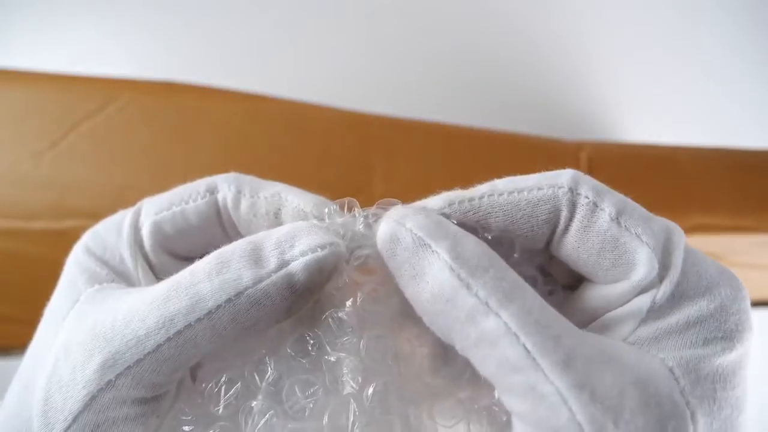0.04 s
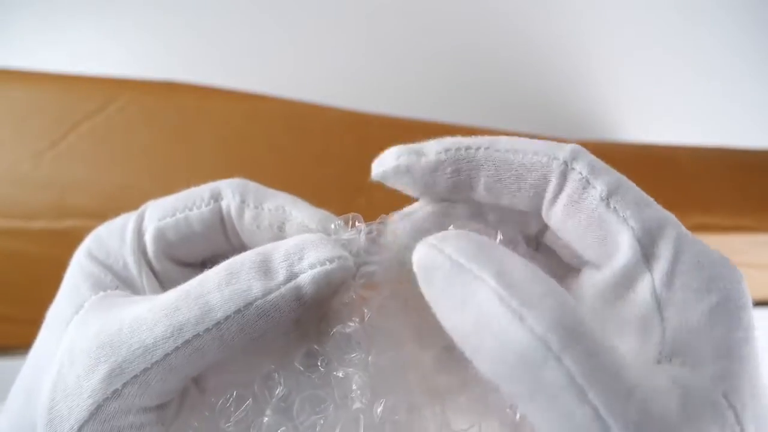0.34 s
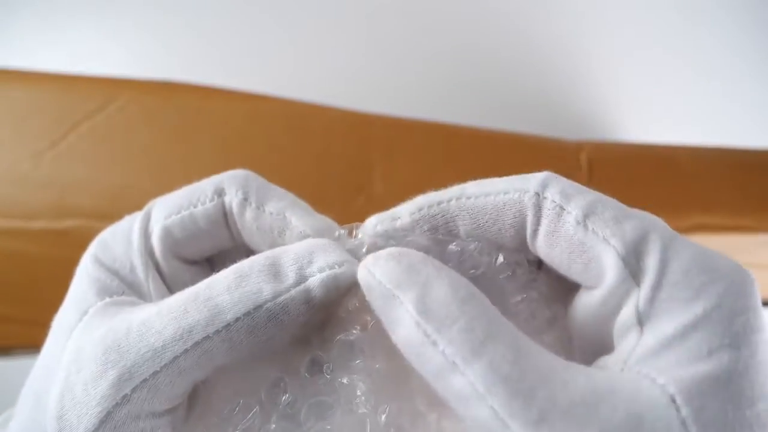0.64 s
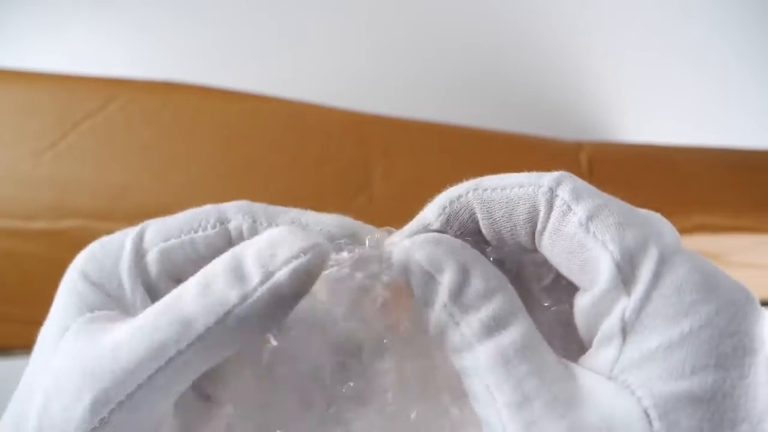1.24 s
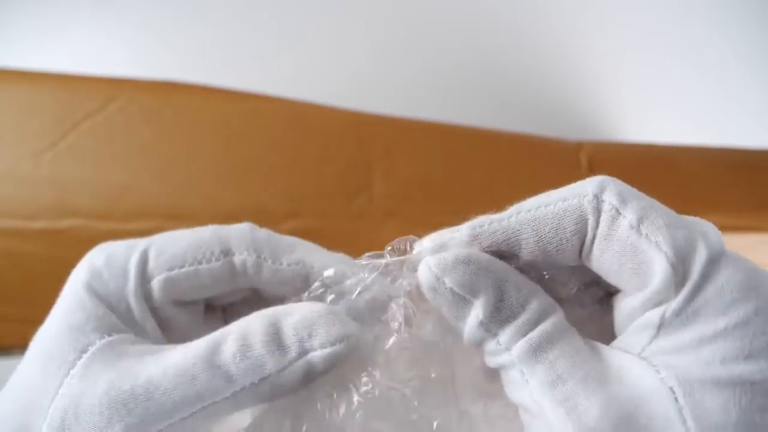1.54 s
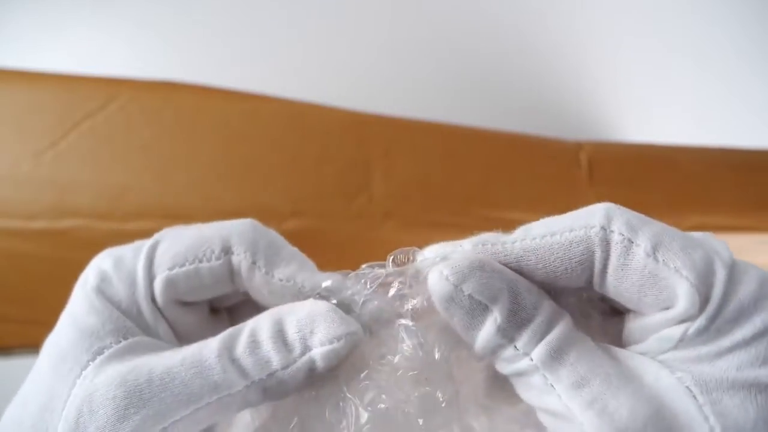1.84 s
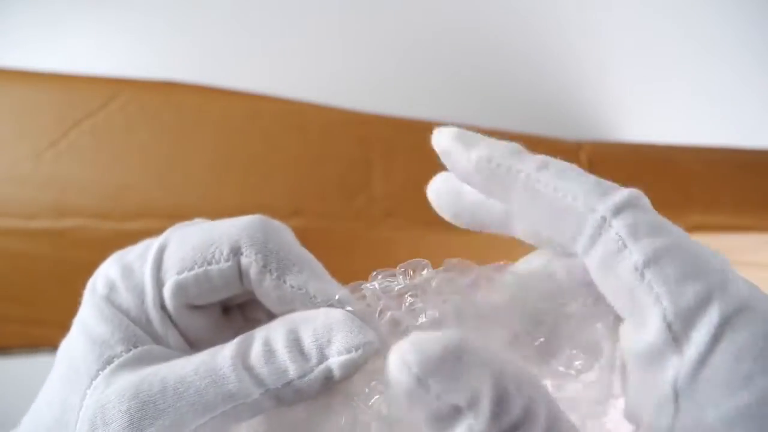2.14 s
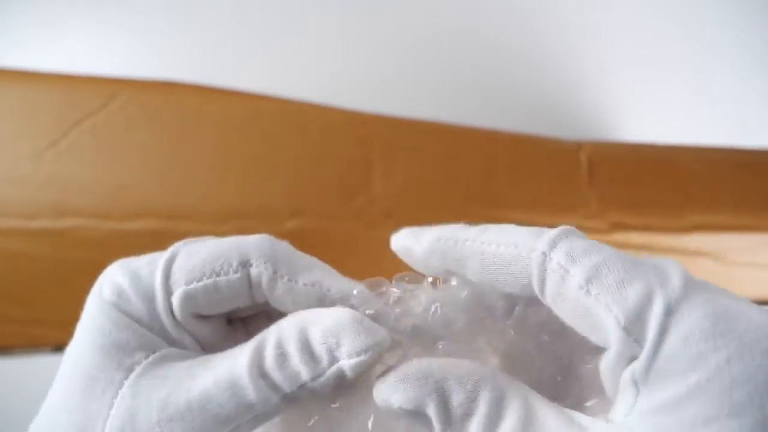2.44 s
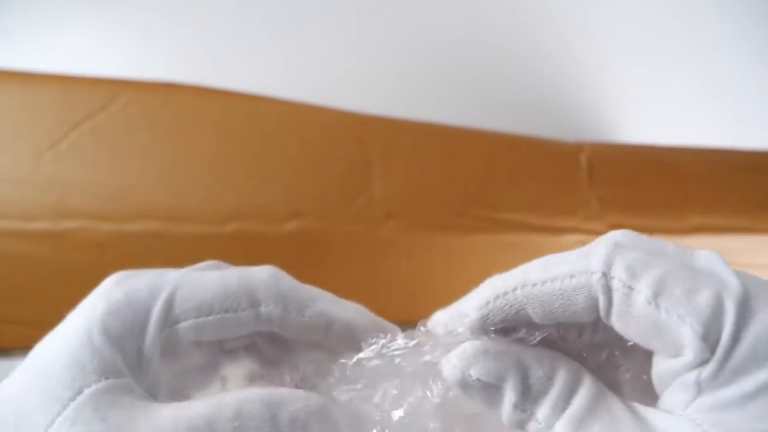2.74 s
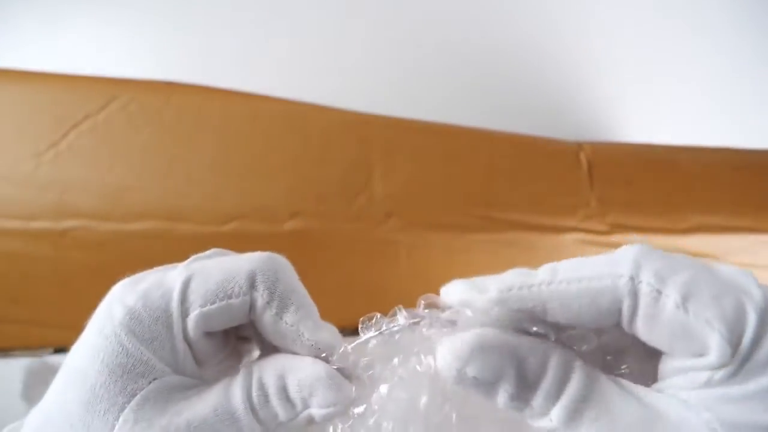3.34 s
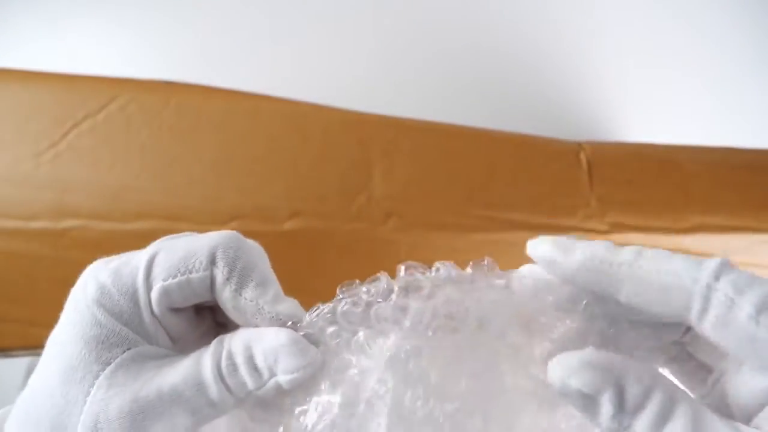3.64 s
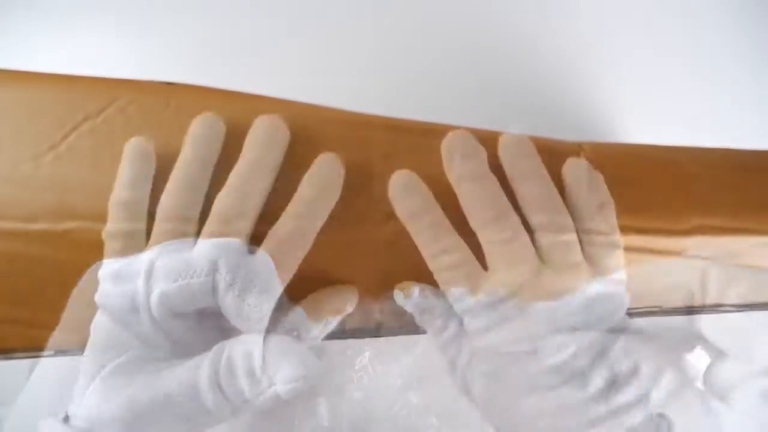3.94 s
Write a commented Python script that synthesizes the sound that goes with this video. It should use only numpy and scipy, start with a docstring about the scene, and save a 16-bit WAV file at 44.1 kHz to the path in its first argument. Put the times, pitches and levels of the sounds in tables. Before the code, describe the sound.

Bubble wrap popping sharply between gloved fingers, with soft plastic crinkling throughout.

```python
"""Bubble wrap bursts as gloved fingers pinch and twist it, close to a microphone in a small room.
Each pop is a sudden release of pressure: a pulse, a ringing skin, tearing film and a thump.
Creases snap by buckling, and the film crinkles, rubs and ticks all the while.
The table and the walls reflect the sound briefly; the loudest pops overload the recorder."""
import sys
import numpy as np
from scipy import signal
from scipy.fft import rfft, irfft
from scipy.io import wavfile

SR = 44100
rng = np.random.default_rng(int(sys.argv[2]) if len(sys.argv) > 2 else 0)


def unload_audio(sound):
    """Save the sound as a 16-bit wav file, at the path given as the first command line argument."""
    columns = np.transpose(np.atleast_2d(sound))
    # keep every value between -1 and 1, then stretch to whole-number steps
    steps = np.round(np.clip(columns, -1, 1) * 32767)
    wavfile.write(sys.argv[1], SR, steps.astype(np.int16))


N = 176400


def undb(db):
    """Amplitude ratio of a level in decibels."""
    return 10 ** (np.asarray(db) / 20)

def unit(x):
    """Normalisation to rms 1."""
    return x / np.sqrt(np.mean(x ** 2))

def highpass(x, hz):
    """First-order high-pass: 6 dB per octave below the corner."""
    return signal.sosfilt(signal.butter(1, hz, "high", fs=SR, output="sos"), x)

def colour(x, points, size=4096):
    """Minimum-phase filter through (f/Hz, gain/dB) points, scaled to keep the power of white noise."""
    hz, db = np.array(points, float).T
    gain = undb(np.interp(np.log(np.fft.rfftfreq(size, 1 / SR) + 1), np.log(hz), db))
    cepstrum = irfft(np.log(unit(gain)))
    cepstrum[1:size // 2] *= 2
    cepstrum[size // 2 + 1:] = 0
    return signal.fftconvolve(x, irfft(np.exp(rfft(cepstrum))))[:len(x)]

def add(track, at, sound):
    """Superposition: a sound joins the track at a time in seconds."""
    i = max(0, int(at * SR))
    track[i:i + len(sound)] += sound[:max(0, N - i)]

def ring(t, hz, cycles):
    """Damped oscillation of a released skin, with no net flow; it falls to 1/e in `cycles` periods."""
    damping = 1 / (2 * np.pi * cycles)
    angle = 2 * np.pi * hz * t
    return np.exp(-damping * angle) * (np.cos(angle) - damping * np.sin(angle))

def clicks(per_s, spread_db):
    """Shot noise: impulses at random times, many weak and a few strong, rms 1."""
    chance, size, sign = rng.random(N), rng.standard_normal(N), rng.choice([-1, 1], N)
    return unit((chance < per_s / SR) * sign * undb(spread_db * np.minimum(size, 2.6)))

def showers(per_s=180, spread_db=2):
    """Random amplitude modulation, in dB: the surges heard as one buckling fold sets off others."""
    steps = np.arange(N) / SR * per_s
    return spread_db * np.interp(steps, np.arange(N), rng.standard_normal(N))

# Working of the sheet: t/s, relative crinkle level/dB, relative rubbing level/dB
HANDLING_LEVELS = [(0, -45, -40.5), (.13, -44, -49.5), (.17, -56, -47.5), (.21, -44, -47.5),
                   (.25, -39, -44), (.30, -36, -43), (.355, -35, -38.5), (.39, -44.5, -42),
                   (.47, -53, -45.5), (.55, -60, -47), (.60, -46.5, -50.5), (.71, -56, -47.5),
                   (.745, -53, -43), (.80, -53, -49.5), (.97, -53, -46.5), (1.04, -52.5, -47.5),
                   (1.16, -47.5, -41.5), (1.21, -34.5, -38.5), (1.26, -30, -39), (1.29, -33.5, -30.5),
                   (1.34, -40.5, -38.5), (1.42, -42, -35), (1.48, -37, -38), (1.57, -36, -37.5),
                   (1.62, -35, -37), (1.72, -47, -43), (1.80, -45, -44), (1.90, -50.5, -37),
                   (1.97, -46.5, -50), (2.00, -38, -39.5), (2.04, -35, -37), (2.14, -34.5, -36),
                   (2.27, -54, -41), (2.32, -47.5, -45), (2.387, -50.5, -44), (2.428, -30, -31),
                   (2.50, -39, -37.5), (2.549, -25.5, -30), (2.61, -34.5, -35), (2.70, -34, -33),
                   (2.80, -40.5, -38.5), (2.92, -41.5, -40), (3.01, -41, -37), (3.19, -40.5, -41.5),
                   (3.32, -45, -38), (3.38, -36.5, -34.5), (3.452, -32, -30.5), (3.53, -37, -35.5),
                   (3.61, -39.5, -35.5), (3.66, -36.5, -35.5), (3.75, -32.5, -30.5), (3.82, -31.5, -33.5),
                   (3.90, -43, -39.5), (4.0, -44.5, -42.5)]
# Spectral shape of the buckling folds: f/Hz, gain/dB
CRINKLE_SPECTRUM = [(100, -34), (800, -11), (2000, -20.5), (4200, 6.5), (5500, 1), (7500, 3.5),
                    (10500, 2.5), (15000, -1.5), (16500, -10)]
# Spectral shape of the friction: f/Hz, gain/dB
RUB_SPECTRUM = [(30, -3), (80, 2.5), (140, 0), (250, -5), (480, -2.5), (700, -3), (900, -0.5), (1300, -2.5),
                (1720, 4), (2100, 1.5), (2800, -1), (4100, -2), (6000, -5), (16000, -13.5)]

def rustle(folds_per_s=2000, fold_sizes=5, decay_s=0.00017):
    """Buckling and friction: small folds ring while cotton and film slip over the air-filled cells."""
    t = np.arange(N) / SR
    at, crinkle_db, rub_db = np.array(HANDLING_LEVELS, float).T
    folds = np.zeros(N)
    for hz in np.linspace(3800, 14000, fold_sizes):
        buckles = clicks(folds_per_s / fold_sizes, spread_db=6)
        folds += unit(signal.fftconvolve(buckles, ring(t[:256], hz, hz * decay_s))[:N])
    crinkle_gain = undb(np.interp(t, at, crinkle_db) - 0.5 + showers())
    crinkle = unit(colour(folds, CRINKLE_SPECTRUM)) * crinkle_gain
    slips = clicks(per_s=3400, spread_db=5)
    rub = unit(colour(slips, RUB_SPECTRUM)) * undb(np.interp(t, at, rub_db) + 1)
    return crinkle + rub

# Spectral shape of the ticks: f/Hz, gain/dB
TICK_SPECTRUM = [(500, -27), (1800, 12.5), (4000, 10), (7000, 0), (11000, -8.5), (16000, -17.5)]

def ticks(follow=0.46):
    """Acoustic emission: stretched film ticks even at rest, and partly follows the crinkle level."""
    at, crinkle_db, _ = np.array(HANDLING_LEVELS, float).T
    level_db = -31 + follow * np.interp(np.arange(N) / SR, at, crinkle_db)
    return colour(clicks(per_s=91, spread_db=10), TICK_SPECTRUM) * undb(level_db)

# Spectral shape of the background: f/Hz, gain/dB
BACKGROUND_SPECTRUM = [(20, 16), (55, 9), (120, -3.5), (300, -30.5), (700, -0.5), (1800, -29), (5000, -55),
                       (16000, -53)]

def background(level_db=-64):
    """Stationary noise: a faint, steady rumble in the room."""
    return undb(level_db) * unit(colour(rng.standard_normal(N), BACKGROUND_SPECTRUM))

# Bursting bubbles: t/s, level/dB, ring f/Hz, ring decay/cycles, opening time/ms, tear/dB, thump/dB,
# thump f/Hz, thump decay/cycles, room/dB (tear, thump and room are relative to the level)
BUBBLE_BURSTS = [(.0130, 12.5, 820, 0.2, 0.007, -11, -32.5, 40.2, 0.19, -6),
                 (0.8414, 13.5, 1490, 0.43, 0.008, -8, -34.5, 50, 0.37, -4.5),
                 (1.2745, 9.5, 1150, 0.34, 0.012, -14, -25, 100, 0.17, -8.5),
                 (1.5206, -0.5, 1640, 0.6, 0.068, -10, -11, 443, 0.5, 0.5),
                 (1.6460, 10, 1270, 0.29, 0.016, -3.5, -13.5, 260, 0.19, -15),
                 (1.8208, 7, 1160, 0.24, 0.01, -11, -17, 104, 0.39, -9),
                 (1.8921, -24.5, 1600, 0.35, .07, 2, 0.5, 332, 0.86, -15),
                 (2.1689, 8, 2230, 0.81, 0.056, -10.5, -15.5, 394, 0.26, -5),
                 (2.1799, 2.5, 930, 0.5, 0.026, 0.5, -16.5, 69, 0.22, -5.5),
                 (3.0338, 7, 1970, 0.29, .02, 1, -9.5, 554, 0.89, -6),
                 (3.0810, 9.5, 1350, 0.28, 0.01, -14.5, -28, 90, 0.26, -6.5),
                 (3.2336, 1.5, 1410, .2, 0.042, -1, -13.5, 138, 0.13, -7),
                 (3.2575, 10, 835, 0.11, 0.023, -19, -28, 483, 1, -12),
                 (3.3943, -0.5, 1730, 1.13, 0.028, -3, -7, 387, 0.44, -4),
                 (3.4878, 12.5, 1680, 0.84, 0.015, -7.5, -23, 250, 0.3, -5),
                 (3.5336, 6, 2850, 0.35, 0.032, -20, -23.5, 293, .4, -7)]

def pops(tear_decay_s=0.00062, tear_corner_hz=2040, size=4096):
    """Sudden pressure release: each bubble opens, rings, tears and collapses with a thump."""
    t, out = (np.arange(size) + .5) / SR, np.zeros(N)
    for (at, db, hz, cycles, open_ms, tear_db,
         thump_db, thump_hz, thump_cycles, room_db) in BUBBLE_BURSTS:
        opening = np.exp(-t * 1000 / open_ms)  # a slower opening dulls the pulse
        pulse = ring(t, hz, cycles) - undb(thump_db) * ring(t, thump_hz, thump_cycles)
        pulse = signal.fftconvolve(pulse, opening / opening.sum())[:size]
        tear_envelope = undb(tear_db) * np.exp(-t / tear_decay_s)
        tear = highpass(rng.standard_normal(size) * tear_envelope, tear_corner_hz)
        # the tear reaches the walls as one click of the same energy
        crack = highpass(signal.unit_impulse(size) * np.linalg.norm(tear_envelope), tear_corner_hz)
        add(out, at, undb(db) * near_echoes(pulse + tear))
        add(out, at, undb(db + room_db) * room(pulse + crack))
    return out

# Reflections from near surfaces: delay/s, level/dB
REFLECTIONS = [(.0006, -20), (.0015, -32.5), (.0043, -18), (.0100, -28)]

def near_echoes(x, scatter=0.18):
    """Early reflection from hands, table and box, by paths that differ a little for each event."""
    out = x.copy()
    for (delay, db), shift in zip(REFLECTIONS, rng.uniform(-0.81, 1, len(REFLECTIONS))):
        lag = int(delay * (1 + scatter * shift) * SR)
        out[lag:] += undb(db) * x[:-lag]
    return out

# Spectral shape of the reverberation: f/Hz, gain/dB
ROOM_SPECTRUM = [(40, -27), (150, -10.5), (330, -2), (570, -5.5), (800, -6.5), (1300, -7.5), (1720, -3),
                 (2200, -3), (2800, -4.5), (4000, 6), (5500, -2), (9000, -2.5), (15000, -17.5)]

def room(x, build_s=0.00017, early_t60_s=0.076, late_t60_s=0.27):
    """Reverberation: a diffuse field builds up, then decays at two rates; each call has a new tail."""
    t = np.arange(SR // 2) / SR
    early = undb(-60 * t / early_t60_s)
    late = undb(-10 - 60 * t / late_t60_s)
    envelope = (1 - np.exp(-t / build_s)) * (early + late)
    tail = colour(rng.standard_normal(len(t)) * envelope / np.linalg.norm(envelope), ROOM_SPECTRUM)
    return undb(-2.5) * signal.fftconvolve(x, tail)

# Snapping creases: t/s, level/dB, f/Hz
CREASE_SNAPS = [(.1194, -16.5, 4450), (.1914, -11.5, 7100), (0.2306, -9.5, 6800), (0.2824, -12, 7000),
                (0.2882, -10, 9400), (0.2988, -2.5, 9700), (0.3076, -10, 8000), (.3222, -15, 8000),
                (0.3477, -7.5, 7140), (.4570, -2.5, 8100), (0.4844, -14.5, 4930), (0.5932, -18.5, 5900),
                (0.6469, -16, 11000), (0.6855, -19, 6950), (.7012, -19, 9000), (.7758, -18, 12000),
                (1.0022, -19, 10000), (1.1704, -17, 11000), (1.186, -17, 9000), (1.2172, -12, 10000),
                (1.2593, -3, 9000), (0.7406, -8.5, 6000), (.7479, -10, 4170), (0.9875, -21.5, 4000),
                (1.062, -11, 10600), (1.11, -13.5, 9000), (1.141, -9.5, 7450), (1.2067, -14, 7000),
                (1.236, -14, 8000), (1.2438, -4, 5860), (1.2526, -5, 8000), (1.355, -13, 9000),
                (1.4148, -10, 10000), (1.4996, -2, 9200), (1.6226, -5.5, 11100), (1.7535, -12.5, 6760),
                (1.7663, -15, 6860), (1.9132, -17, 4260), (2.0294, -10, 4670), (2.0539, -25, 6060),
                (2.1065, 1, 10000), (2.1332, -9, 6000), (2.1524, 8.5, 6750), (2.3484, -24, 3400),
                (2.453, -12, 10000), (2.4791, -7, 10000), (2.4814, -7, 9800), (2.5685, -14, 8000),
                (2.698, 3, 5160), (2.7275, -4, 4250), (2.7796, -7, 7400), (3.0027, -11, 3000),
                (3.2803, 1, 10600), (3.2973, -14, 6000), (3.31, -10, 10000), (3.3587, -8.5, 7240),
                (3.3803, -7, 6000), (3.4762, -8, 7500), (3.7453, 0, 5800), (3.8571, -8, 7000)]

def snaps(flutter_decay_s=0.0008, size=1024):
    """Snap-through buckling: a crease flips over with a short high ring and a flutter of film."""
    t, out = (np.arange(size) + .5) / SR, np.zeros(N)
    for at, db, hz in CREASE_SNAPS:
        flutter = highpass(rng.standard_normal(size) * np.exp(-t / flutter_decay_s), hz=1170)
        snap = ring(t, hz, cycles=0.86) + undb(-11) * flutter
        add(out, at, undb(db) * near_echoes(snap))
    return out

# Tone colour of the faint stereo width: f/Hz, gain/dB
WIDTH_SPECTRUM = [(50, 9), (130, 2.5), (500, 7), (2000, -9.5), (5000, 2.5), (14000, 8)]

def stereo(mid, side_db=-23.5, smear_s=0.0014, size=1024):
    """Decorrelation: a weak, phase-scattered copy, opposite in the two channels, gives a faint width."""
    spectrum = rfft(rng.standard_normal(size) * np.exp(-np.arange(size) / SR / smear_s))
    allpass = np.roll(irfft(spectrum / np.abs(spectrum)), size // 16)
    side = undb(side_db) * colour(signal.fftconvolve(mid, allpass)[:N], WIDTH_SPECTRUM)
    return np.array([mid + side, mid - side])

def scene():
    """Superposition of direct sound, reverberation and background, centred between the channels."""
    bursts, creases, film = pops(), snaps() + ticks(), rustle()
    reverberation = room(undb(-13.5) * creases + undb(-17) * film)[:N]
    return stereo(bursts + creases + film + reverberation + background())

def record(dry, top_hz=15500):
    """Saturation and band limiting: the recorder clips the loudest pops, then cuts the top."""
    lowpass = signal.ellip(8, .2, 70, top_hz, fs=SR, output="sos")
    return signal.sosfilt(lowpass, np.clip(dry, -1, 1))


dry = scene()
out = record(dry)
unload_audio(out)
```